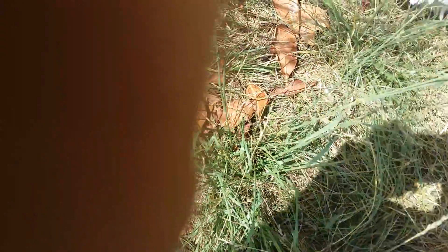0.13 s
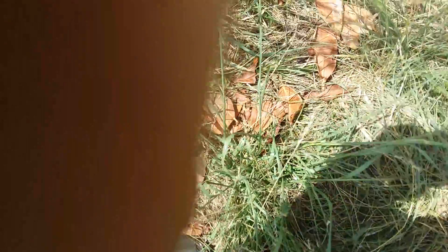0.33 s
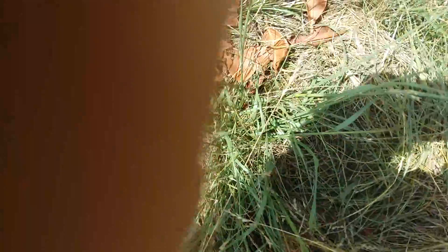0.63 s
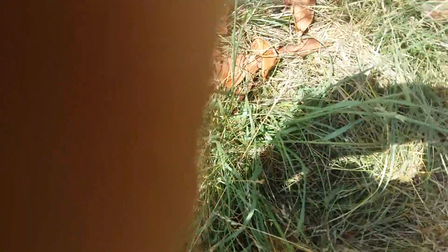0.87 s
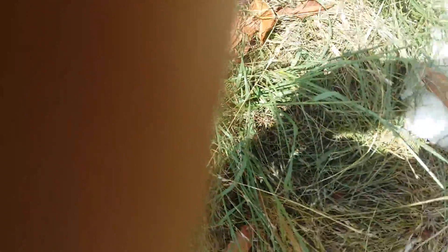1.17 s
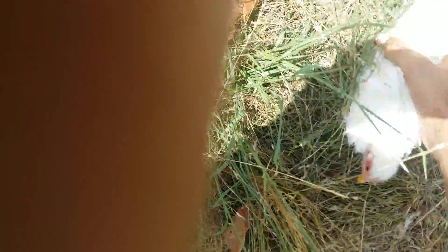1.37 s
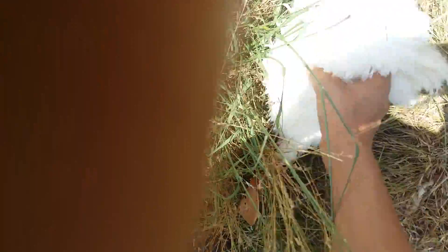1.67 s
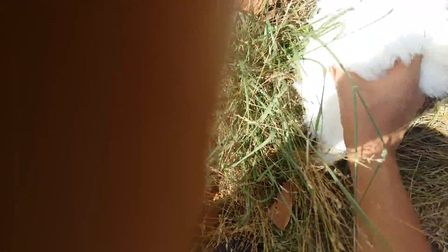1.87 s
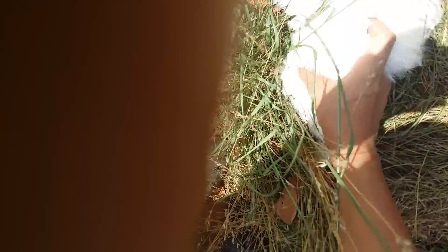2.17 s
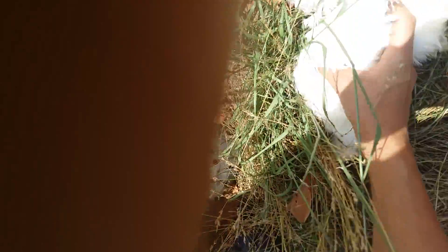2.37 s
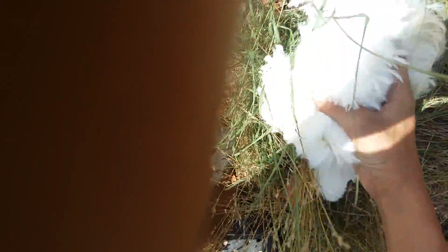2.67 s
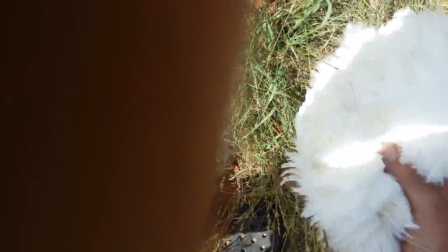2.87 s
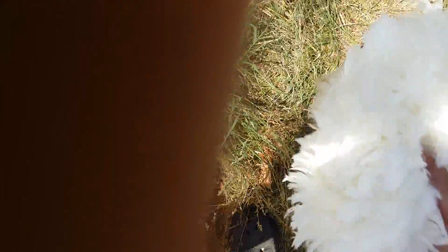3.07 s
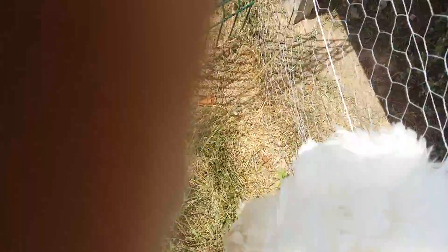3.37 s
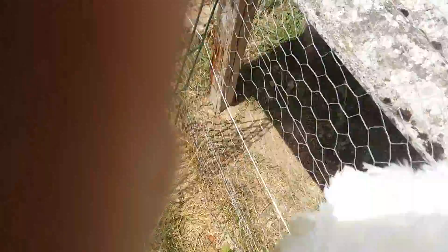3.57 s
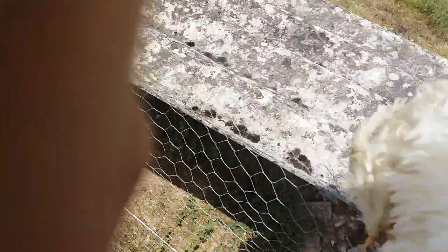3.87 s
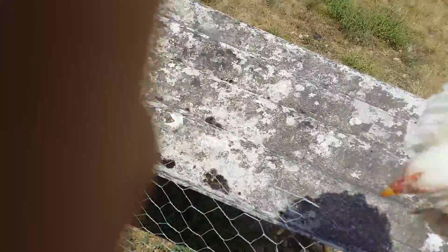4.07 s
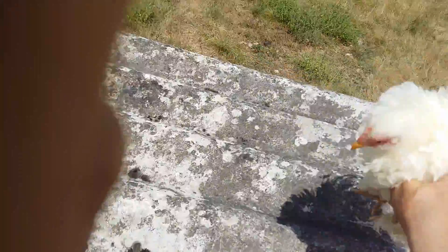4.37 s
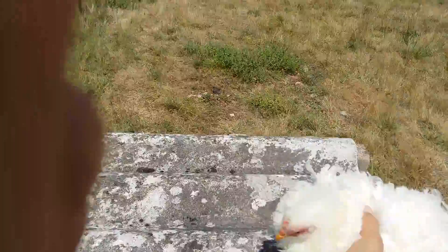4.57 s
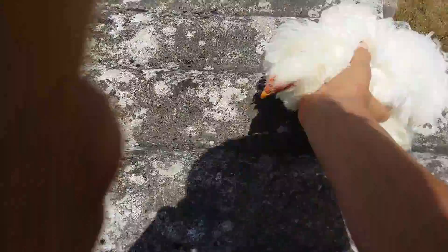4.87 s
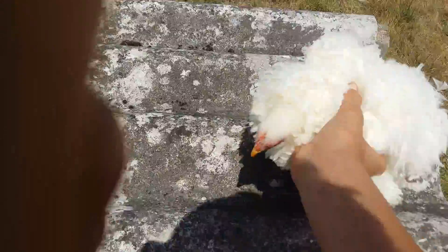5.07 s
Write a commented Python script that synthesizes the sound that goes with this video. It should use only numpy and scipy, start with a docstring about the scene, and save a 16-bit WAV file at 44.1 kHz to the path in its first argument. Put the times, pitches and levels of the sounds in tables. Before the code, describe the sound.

Outdoors in quiet open air, a caught young chicken gives two tiny clucks, then a fast series of harsh, throbbing squawks, some cracking into thin squeaks. Calls become sparser, then turn to short soft clucks as feathers rustle more strongly and claws tick on wire and roofing. A close handheld stereo microphone picks up a few low handling bumps.

```python
"""A young chicken is caught in the grass: two short clucks and a run of harsh squawks,
then more clucks as it is set on a coop roof. A pulsing voice rings in four throat resonances; some calls crack.
Feathers and dry grass rustle (flickering noise), claws tick on wire and roofing (tiny noise bursts),
and the hand bumps a small two-port camera (sagging low tones). Quiet open air (steady noise) lies behind it all."""
import sys
import numpy as np
from scipy import signal
from scipy.fft import rfft, irfft
from scipy.io import wavfile
from scipy.ndimage import uniform_filter1d, minimum_filter1d

SR = 44100
rng = np.random.default_rng(int(sys.argv[2]) if len(sys.argv) > 2 else 0)


def to_wav(sig):
    """Store sig (one row per channel, or 1-D mono) as 16-bit WAV at the path in sys.argv[1].

    Samples outside -1..1 are clipped; the rate is SR.
    """
    pcm = np.clip(np.atleast_2d(sig), -1, 1) * 32767
    pcm = np.round(pcm).astype(np.int16)
    wavfile.write(sys.argv[1], SR, pcm.T)  # frames by channels


N = 229540
T = np.arange(N) / SR
CUTOFF_HZ = 15900

# spectrum of the outdoor background, only its shape counts: (frequency [Hz], relative density [dB])
AIR_SPECTRUM = [(15, -67), (25, -28.5), (46, 2.5), (91, 3.5), (253, -4.5), (421, -6), (631, -7), (762, -12),
                (1050, -11.5), (1450, -18.5), (2060, -18), (2630, -11.5), (3930, -14), (5880, -29),
                (15500, -35)]
AIR_DB = -53
# spectrum of rubbing feathers and grass, only its shape counts: (frequency [Hz], relative density [dB])
RUSTLE_SPECTRUM = [(150, -22.5), (250, -2.5), (353, -5.5), (525, -2.5), (593, -9), (809, -6), (1120, -12.5),
                   (1590, -4.5), (1920, -9.5), (2280, 0), (3220, -9.5), (3960, -3.5), (6650, -28),
                   (13700, -66), (15500, -36.5)]
# strength of the rubbing, light in the grass and stronger toward the roof: (time [s], level before a trim [dB])
RUSTLE_DB = [(0, -58.5), (.23, -50.5), (.45, -55), (1.4, -58), (1.83, -57.5), (1.95, -63.5), (2.25, -52.5),
             (2.5, -61.5), (3.15, -63.5), (3.41, -50), (3.51, -70), (3.64, -44), (4.05, -41), (4.25, -50.5),
             (4.39, -46.5), (4.51, -50), (4.62, -39), (4.78, -40), (4.92, -51.5), (5.19, -66)]
# treble of the rubbing, duller in the air and brighter on the roof: (time [s], treble gain [dB])
RUSTLE_TREBLE_DB = [(3.4, 4), (3.85, -3), (4.1, -6.5), (4.4, 10), (4.75, -1), (5.1, 6)]

# short clucks: (start [s], length [s], first pitch [Hz], last pitch [Hz], roughness [0-1],
# beak factor on the resonances, level of each of the four throat resonances before their gain [dB, four columns])
CLUCKS = [ (0.012, 0.026, 703, 539, 0.75, 1.35, -30.5, -21.5, -42.5, -48.5),
          (0.156, 0.029, 620, 532, 0.56, 0.74, -33, -24, -29.5, -52),
          (3.541, 0.05, 502, 376.5, 0.27, 1.16, -29, -31.5, -26, -42.5),
          (3.704, 0.039, 541, 471, 0.3, 1.08, -40, -38, -32, -41),
          (4.163, 0.037, 501, 342.6, 0.25, 1.08, -29, -29, -23.5, -44.5),
          (4.319, 0.030, 545.4, 559, 0.39, 0.85, -30.5, -30.5, -25.5, -58),
          (4.637, 0.041, 620, 552, 0.31, 1.2, -33, -26.5, -34, -52),
          (4.789, 0.039, 592, 489, 0.34, 1.28, -36, -25, -24.5, -49)]
# thin, near-pure notes where the voice cracks or screams:
# (start [s], length [s], first pitch [Hz], middle pitch [Hz], last pitch [Hz], level before flutter [dB])
SQUEAKS = [ (0.015, 0.0255, 1344, 1130, 1093, -28), (0.15, 0.034, 1360, 1170, 1080, -30.5),
           (0.519, 0.014, 2150, 1891, 1860, -21), (0.935, 0.019, 2103, 1999, 1860, -9),
           (1.588, 0.092, 1306, 1440, 1305, -16.5), (1.591, 0.014, 1997, 1850, 2160, -5.5),
           (1.603, 0.02, 2550, 2530, 2530, -16), (1.615, 0.045, 1850, 1810, 1790, -7),
           (2.979, 0.011, 2380, 2150, 1900, -10.5), (3.532, 0.02, 1980, 1580, 1360, -26),
           (3.698, 0.052, 1576, 1456, 1426, -28.5), (4.148, 0.025, 2000, 1490, 1660, -23.5),
           (4.31, 0.021, 1936, 1468, 1400, -24.5)]
# forced cries: (start [s], length [s], top pitch [Hz], roughness [0-1], beak factor on the resonances,
# place of greatest effort [0-1], loss of level per call length away from it [dB],
# level of each of the four throat resonances before their gain [dB, four columns])
SQUAWKS = [ (0.241, 0.15, 699.5, 0.51, 1.046, .4, 11.7, -34, -20.5, -18, -22),
           (0.481, 0.073, 716, 0.39, .9, 0.55, 39, -28.5, -16, -6.5, -21.5),
           (0.644, 0.19, 735.7, 0.42, 1.09, 0.64, 19.8, -31, -18, -19.5, -18.5),
           (0.900, 0.078, 716.5, 0.6, 0.9, .4, 9.9, -24, -44, -2.5, -12.5),
           (1.043, 0.094, 715.7, 0.39, 0.91, .35, 28.6, -25, -17, -15.5, -17),
           (1.205, 0.13, 758.5, 0.28, 0.91, 0.34, 13, -27, -18, -17, -17.5),
           (1.419, 0.065, 739, 0.42, 0.97, 0.64, 30, -27.5, -15, -11.5, -17),
           (1.586, 0.15, 726, 0.41, 1.054, .6, 1.3, -21, -20.5, -20.5, -18.5),
           (2.154, 0.13, 663, 0.57, 1.126, .70, 5.6, -22.5, -30, -29.5, -32.5),
           (2.66, 0.14, 639, 0.48, 1.13, .85, 12.2, -20.5, -26, -20, -29),
           (2.98, 0.07, 650, 0.27, 1.12, 0.51, 5.3, -21, -21.5, -17.5, -33),
           (3.043, 0.056, 653.6, 0.52, 1.1, .55, 11, -22.5, -20, -19.5, -34.5)]
# throat resonances: (centre [Hz], width [Hz], how far it follows the beak factor [0-1], gain [dB])
THROAT = [(527.5, 674, 0.3, -1.5), (1286, 1010, 0, -1.5), (2063, 1410, 1, -1), (3968, 2140, 0.64, -3.5)]
# how far each throat resonance follows the swell of effort: (share, one per resonance)
SWELL_SHARE = (0.14, 0.76, 0.98, 1.09)
# overtones above the throat: (frequency [Hz], relative level [dB])
EDGE = [(3000, -31.5), (5000, -3.5), (6000, 6.5), (7000, -4), (9000, -10), (12000, -20.5), (16000, -17)]

# dry ticks of claws, wire and stalks:
# (time [s], base level [dB], then relative level of its body, middle and top [dB, three columns])
TICKS = [(0.106, -40, -8.5, -6, -34), (0.4684, -34.5, 1, 12, -27), (0.5865, -30, -10.5, 7, -40),
         (3.22, -38.5, 9, -27, -32), (3.2928, -32.5, -8.5, 8, -46), (3.4173, -31, -4.5, -22, -44),
         (3.6524, -14, -38, 6, -37), (3.6632, -18, -12, -3, -29), (3.6756, -25.5, -31, 14.5, -28),
         (3.6933, -32, -4.5, 24.5, -22), (3.7557, -30.5, -6, 11, -28), (3.7647, -19.5, -4, 6.5, -42),
         (4.1087, -24.5, -14, 10, -52), (4.1246, -34.5, -3, 15, -39), (4.3496, -32, 1, -18, -43),
         (4.4552, -19.5, -8, -1, -45)]
# bands of a tick: (low edge [Hz], high edge [Hz], decay [s], gain [dB])
TICK_BANDS = [(503, 4200, 0.0022, -15.5), (2270, 5000, 0.0051, -31), (5560, 23000, 0.003, 0.5)]
# soft bumps of steps and handling: (time [s], level before a boost [dB], starting pitch [Hz], final pitch [Hz], decay [s])
BUMPS = [(2.781, -10.5, 170, 51.5, 0.01), (3.335, -39, 154, 86.6, 0.037), (3.37, -31, 100.3, 54, 0.016),
         (3.692, -32.5, 119, 85, 0.0086), (3.945, -22.5, 119, 95.4, 0.021), (4.46, -26.5, 148, 80, 0.0062),
         (4.505, -38, 86, 71.2, 0.068), (4.581, -28.5, 101, 85.5, 0.0061), (0.218, -44.5, 91, 66, 0.046)]

# where the bird is: (time [s], how much later it reaches the left port [ms])
BEARING = [(0, .35), (1.45, .33), (1.6, .26), (2.2, .17), (2.7, .17), (3.55, -.03), (3.7, .03), (4.2, .17),
           (4.8, .07)]
# colour of the half-covered left port: (frequency [Hz], left minus right [dB])
PORT = [(300, 2), (700, 0), (1400, 3), (2050, -1.5), (2700, 6), (3500, 1), (4000, 2), (4900, 5.5),
        (8000, 2), (15000, 1.5)]
# further lag of the half-covered left port: (frequency [Hz], phase lag [rad])
PORT_LAG = [(2000, 0), (2700, .6), (3500, 2), (4400, 2.5), (5000, 3)]

# a squawk opens fast and closes more slowly; a cluck is a quick puff
SQUAWK_ATTACK_S, SQUAWK_RELEASE_S, CLUCK_ATTACK_S, CLUCK_RELEASE_S = .011, 0.028, 0.0063, 0.011
# the pitch scoops up into a squawk and drops out of it (shares of the pitch);
# a cry shorter than FULL_DROP_S falls less far
SCOOP, SCOOP_S, DROP, DROP_S, FULL_DROP_S = .16, .010, 0.2835, .025, .13
# away from the greatest effort, pitch and roughness ease (share per call length)
PITCH_EASE, ROUGH_EASE = .08, 0.21
# a forced voice throbs: average rate, depth in level, depth in pitch (share)
THROB_HZ, THROB_DB, THROB_BEND = 51.76, 1.23, 0.017
# a forced voice cannot hold its pitch: share at full roughness, lurches per second
LURCH, LURCH_PER_S = 0.0274, 93
# upper resonances fade before the lowest (extra power on the envelope)
FADE_FIRST = 0.15
# during a whistle the lowest resonance is starved (dB) and the rasp clears (share)
STARVE_DB, CLEARING = -11, 0.21


def gain_of(db):
    """Turns decibels into an amplitude factor."""
    return 10 ** (np.asarray(db) / 20)


def evened(x):
    """Scales a sound to an average (rms) strength of 1."""
    return x / np.sqrt(np.mean(x ** 2) + 1e-20)


def read(points, hz):
    """Reads a curve between its points, with frequency on a log axis."""
    f, value = np.transpose(points)
    return np.interp(np.log(hz + 1), np.log(f + 1), value)


def colour(x, points, share=1):
    """Strengthens or weakens each frequency of x by a curve in dB."""
    size = x.shape[-1]
    curve_db = share * read(points, np.fft.rfftfreq(size, 1 / SR))
    return irfft(rfft(x) * gain_of(curve_db), size)


def add(mix, s, sound):
    """Mixes a sound in at time s, cutting off what runs past the end."""
    part = mix[..., max(0, round(s * SR)):][..., :sound.shape[-1]]
    part += sound[..., :part.shape[-1]]


def band(x, lo_hz, hi_hz, order=2):
    """Keeps the frequencies between two edges, using only past samples."""
    edges = [lo_hz, min(hi_hz, SR / 2 - 1)]
    return signal.sosfilt(signal.butter(order, edges, "band", fs=SR, output="sos"), x)


def wander(size, rate):
    """Random drift: straight lines between chance values, drawn rate times a second."""
    at = np.arange(size) * rate / SR
    return np.interp(at, np.arange(size), rng.standard_normal(size))


def steadied(x, span_s=0.018):
    """Takes the slow swell out of x and keeps its fast grain."""
    size = max(int(span_s * SR), 2)
    power = uniform_filter1d(uniform_filter1d(x ** 2, size), size)
    return x / np.sqrt(abs(power) + 1e-12)


def envelope(t, attack_s, release_s):
    """Attack, hold and release, squared so that the ends are gentle."""
    rise = np.clip(t / attack_s, 0, 1)
    fall = np.clip((t[-1] - t) / release_s, 0, 1)
    return (rise * fall) ** 2


def noise_pair(likeness):
    """White noise at two ports, sharing the given part of its power."""
    shared = np.sqrt(likeness) * rng.standard_normal(N)
    return shared + np.sqrt(1 - likeness) * rng.standard_normal((2, N))


def air(swell_db=1):
    """Quiet open-air background: coloured noise, largely unrelated at the two ports."""
    wash = evened(colour(noise_pair(.25), AIR_SPECTRUM))
    return gain_of(AIR_DB + swell_db * wander(N, 37)) * wash


def rustle(trim_db=-1, flicker_db=0.5, grain_db=3, treble_hz=2900):
    """Feathers and stalks rub in many tiny slips: noise whose level jumps quickly."""
    stroke_db = np.interp(T, *np.transpose(RUSTLE_DB))
    treble_db = np.interp(T, *np.transpose(RUSTLE_TREBLE_DB))
    slips = noise_pair(0.36) * gain_of(grain_db * wander(N, 1500) + flicker_db * wander(N, 67))
    rub = evened(colour(slips, RUSTLE_SPECTRUM))
    high_pass = signal.butter(2, treble_hz, "high", fs=SR, output="sos")
    treble = signal.sosfiltfilt(high_pass, rub)
    return gain_of(stroke_db + trim_db) * (rub + (gain_of(treble_db) - 1) * treble)


def resonance(x, hz, width_hz, steep=2.457):
    """Keeps what lies around one resonance, where the air in the throat rings most easily."""
    f = np.fft.rfftfreq(len(x), 1 / SR)
    return irfft(rfft(x) * (1 + (2 * (f - hz) / width_hz) ** 2) ** -steep, len(x))


def whistling(t, fade_s=0.0027):
    """How fully the syrinx (the bird's voice organ) is in its whistle at times t, 0-1."""
    amounts = []
    for s, length, *_ in SQUEAKS:
        edges = np.clip(np.minimum(t - s, s + length - t) / fade_s, 0, 1)
        second_half = np.clip(2 * (s + length - t) / length, 0, 1)  # eases off from the middle on
        amounts.append(edges * second_half)
    return np.max(amounts, axis=0)


def clap_train(t, hz, rough, jitter=0.0526, slip=0.33, smear=0.171, shimmer_db=6, stumble=60, breath=1.86):
    """The syrinx claps once a cycle; when forced, the claps come uneven and every other one weakens."""
    # the pitch trembles, and single claps slip early or late
    turns = np.cumsum(hz * (1 + jitter * rough * wander(len(t), 251.7))) / SR
    turns = turns + slip * rough ** 2 * wander(len(t), 600)
    # the windpipe smears each clap, its overtones arriving a little later
    overtones = np.arange(1, int(16000 / hz.max()))
    claps = evened(sum(np.cos(2 * np.pi * k * turns - smear * k ** 2) for k in overtones))
    # the strong-weak pattern keeps losing its step, which fills the gaps between the harmonics
    step = stumble * np.cumsum(wander(len(t), 400.3)) / SR
    weak = 1 + rough * np.cos(np.pi * turns + 2 * np.pi * step)
    uneven = gain_of(rough * shimmer_db * wander(len(t), 611.3))
    # breath noise is strongest at the start of each cycle
    puffs = evened((0.13 + np.exp(-(turns % 1))) * rng.standard_normal(len(t)))
    return band((claps + breath * rough ** 2 * puffs) * weak * uneven, 270, CUTOFF_HZ, order=4)


def syrinx(t, hz, rough, beak, levels, rattle_db=4, edge_db=-21, flutter_db=3):
    """Claps of the syrinx ring in four throat resonances, which the beak factor shifts."""
    whistle = whistling(t)
    rough = rough * (1 - CLEARING * whistle)
    drive = clap_train(t, hz, rough)
    levels = [levels[0] * gain_of(STARVE_DB * whistle), *levels[1:]]
    voice = gain_of(edge_db) * levels[-1] * steadied(colour(drive, EDGE))
    for (centre, width, follow, db), level, share in zip(THROAT, levels, SWELL_SHARE):
        # each resonance flutters by itself as the bird struggles
        flutter = gain_of(flutter_db * np.sqrt(rough * share) * wander(len(t), 110))
        ring = steadied(resonance(drive, centre * beak ** follow, width), span_s=0.011)
        voice = voice + gain_of(db) * level * flutter * ring
    return voice * gain_of(rough * rattle_db * wander(len(t), 130))


def cluck(start, length, first_hz, last_hz, rough, beak, *levels_db, sag_curve=.7):
    """A short puff of voice whose pitch slides, fastest at first, usually downward."""
    t = np.arange(0, length, 1 / SR)
    hz = first_hz + (last_hz - first_hz) * (t / length) ** sag_curve
    shape = envelope(t, CLUCK_ATTACK_S, CLUCK_RELEASE_S)
    levels = [shape * gain_of(db) for db in levels_db]
    return start, syrinx(start + t, hz, rough, beak, levels)


def squeak(start, length, first_hz, middle_hz, last_hz, db, waver=0.039, overtone_db=-22, flutter_db=3):
    """A near-pure note that bends as the syrinx catches."""
    t = np.arange(0, length, 1 / SR)
    bend = np.polyfit([0, .5, 1], [first_hz, middle_hz, last_hz], 2)
    hz = np.polyval(bend, t / length)
    phase = 2 * np.pi * np.cumsum(hz * (1 + waver * wander(len(t), 900))) / SR
    note = evened(np.sin(phase) + gain_of(overtone_db) * np.sin(2 * phase))
    level = gain_of(db + flutter_db * wander(len(t), 700))
    return start, note * level * envelope(t, attack_s=0.0064, release_s=0.0067)


def ticks():
    """Each tick is a noise burst in three bands that dies within milliseconds."""
    out, t = np.zeros((2, N)), np.arange(SR // 25) / SR
    for s, base_db, *levels in TICKS:
        for (lo, hi, decay, trim_db), db in zip(TICK_BANDS, levels):
            shared, *own = rng.standard_normal((3, len(t)))
            burst = band((shared + np.array(own)) * np.exp(-t / decay), lo, hi, order=4)
            add(out, s, gain_of(base_db + db + trim_db) * evened(burst))
    return out


def bumps(rise_s=0.0031, sag_s=0.0084, boost_db=8):
    """Low thuds through the camera body, mostly at the right port; their pitch sags as they die."""
    out, t = np.zeros(N), np.arange(SR // 4) / SR
    for s, db, start_hz, end_hz, decay in BUMPS:
        turns = np.cumsum(end_hz + (start_hz - end_hz) * np.exp(-t / sag_s)) / SR
        shape = (1 - np.exp(-t / rise_s)) * np.exp(-t / decay)
        add(out, s, gain_of(db + boost_db) * -np.sin(2 * np.pi * turns) * shape)
    return out * gain_of([[-17], [0]])  # left, right


def squawk(start, length, top_hz, rough, beak, crest, swell_db, *levels_db):
    """One arch of effort makes the cry higher, brighter and rougher; it throbs as it is held."""
    t = np.arange(0, length, 1 / SR)
    slack = abs(t / length - crest)  # distance from the greatest effort
    throb = np.sin(2 * np.pi * np.cumsum(THROB_HZ * (1 + 0.18 * wander(len(t), 40))) / SR)
    scoop = 1 - SCOOP * np.exp(-t / SCOOP_S)
    drop = 1 - DROP * min(length / FULL_DROP_S, 1) * np.exp(-((length - t) / DROP_S) ** 2)
    lurch = LURCH * rough * wander(len(t), LURCH_PER_S)
    hz = top_hz * scoop * drop * (1 - PITCH_EASE * slack + THROB_BEND * throb + lurch)
    shape = envelope(t, SQUAWK_ATTACK_S, SQUAWK_RELEASE_S)
    effort_db = THROB_DB * throb - swell_db * slack
    levels = [shape ** (0.95 + FADE_FIRST * share) * gain_of(db + share * effort_db)
              for db, share in zip(levels_db, SWELL_SHARE)]
    return start, syrinx(start + t, hz, rough * (1 - ROUGH_EASE * slack), beak, levels)


def ground(s, sound, near_db=-11, far_db=-38, far_s=0.029):
    """One call at the two ports: direct, scattered off hand and grass (anew each call), and echoed by the pen."""
    t = np.arange(SR // 5) / SR
    near, far = rng.standard_normal((2, 2, len(t))) * (t > .0007)
    near = band(near * np.exp(-t / .002), 2500, 12000, order=1)
    far = far * np.exp(-t / far_s)
    paths = gain_of(near_db) * near / np.linalg.norm(near[0])
    paths += gain_of(far_db) * far / np.linalg.norm(far[0])
    # direct sound: a click 12 samples in, with the left port later by the bearing
    lag = np.interp(s, *np.transpose(BEARING)) * SR / 1000
    paths[:, :48] += np.sinc(np.arange(48) - 12 - np.array([[lag], [0]]))
    return s, signal.fftconvolve(sound[None], paths, axes=1)


def chicken():
    """All calls, heard by two ports a little apart."""
    out = np.zeros((2, N))
    for call, table in (cluck, CLUCKS), (squeak, SQUEAKS), (squawk, SQUAWKS):
        for row in table:
            add(out, *ground(*call(*row)))
    return out


def scene():
    """The bird, its handling and the open air."""
    return air() + rustle() + chicken() + ticks() + bumps()


def limit(x, ceiling=0.91):
    """Eases the gain down around any peak that would overload."""
    gain = np.minimum(1, ceiling / (abs(x).max(0) + 1e-9))
    return x * uniform_filter1d(minimum_filter1d(gain, size=441), size=441)


def record(dry):
    """The two ports colour and delay the sound differently; then the limiter and the treble cut-off."""
    lag = np.exp(-1j * read(PORT_LAG, np.fft.rfftfreq(N, 1 / SR)))
    # each port takes half of the left-right difference
    left = irfft(rfft(colour(dry[0], PORT, share=.5)) * lag, N)
    right = colour(dry[1], PORT, share=-.5)
    low_pass = signal.firwin(511, CUTOFF_HZ, window=("kaiser", 9), fs=SR)
    return signal.oaconvolve(limit(np.array([left, right])), low_pass[None], "same")


dry = scene()
out = record(dry)
to_wav(out)
```